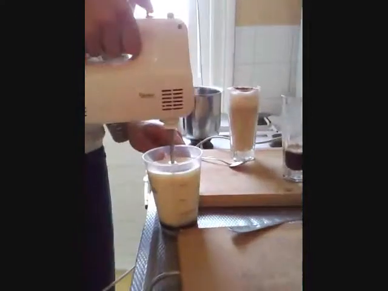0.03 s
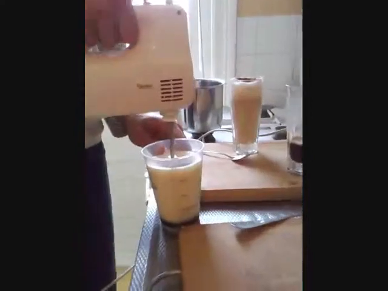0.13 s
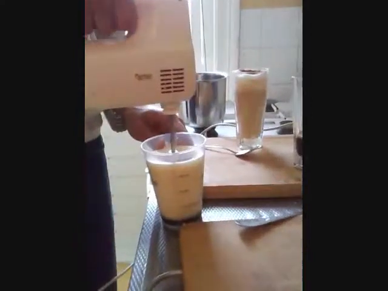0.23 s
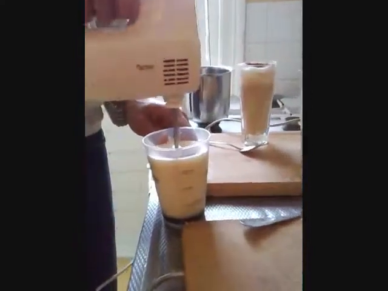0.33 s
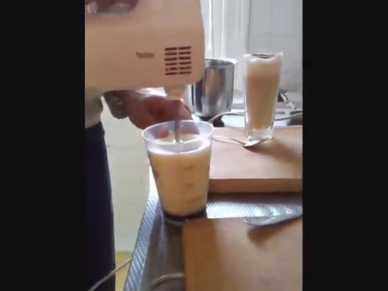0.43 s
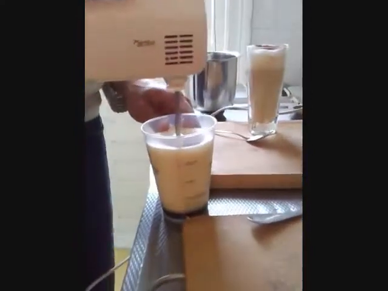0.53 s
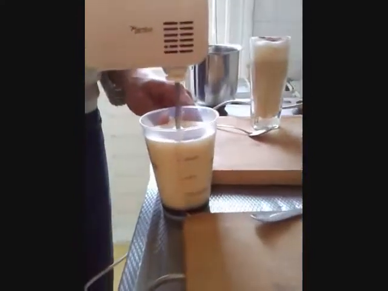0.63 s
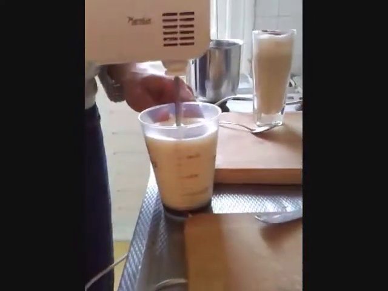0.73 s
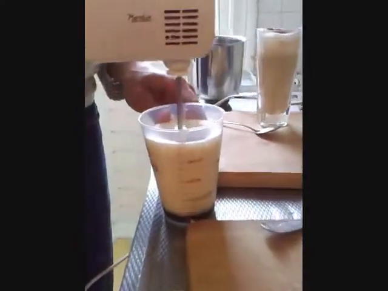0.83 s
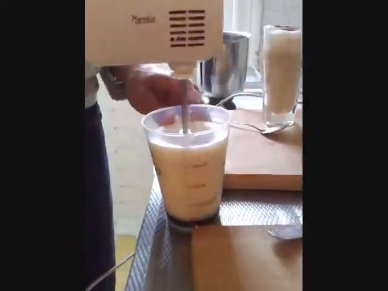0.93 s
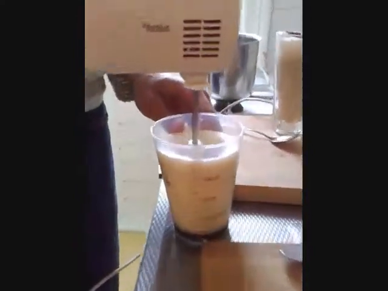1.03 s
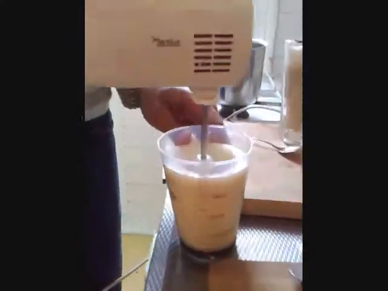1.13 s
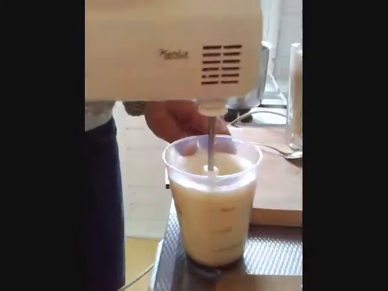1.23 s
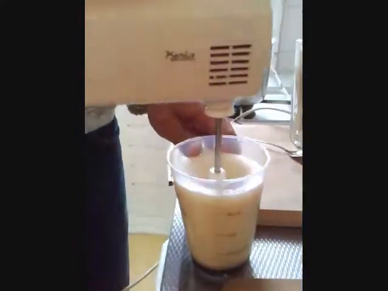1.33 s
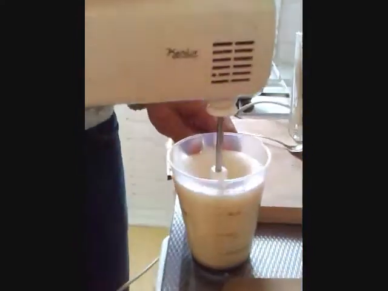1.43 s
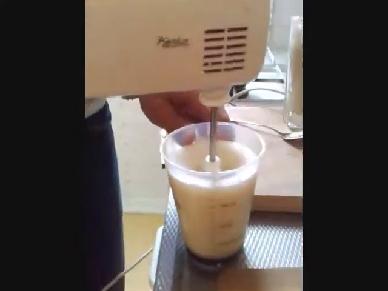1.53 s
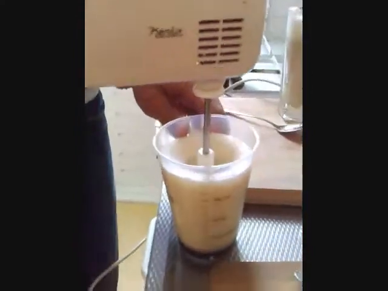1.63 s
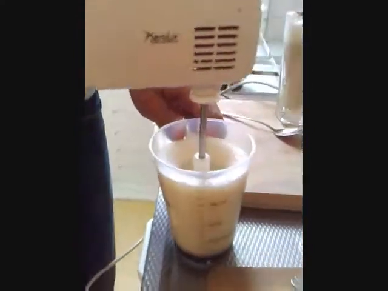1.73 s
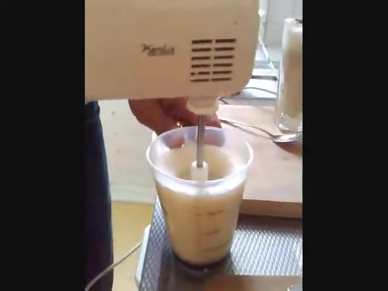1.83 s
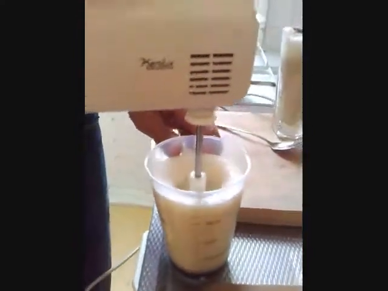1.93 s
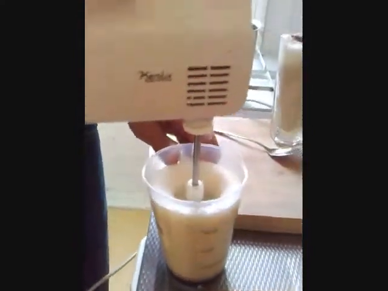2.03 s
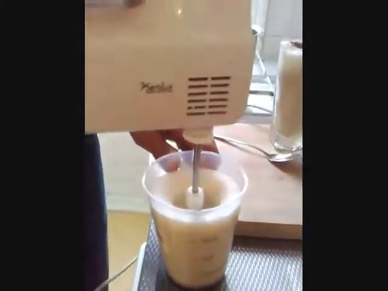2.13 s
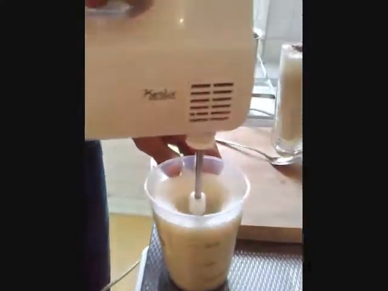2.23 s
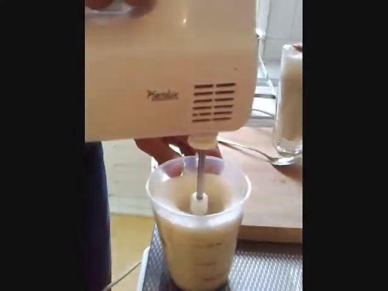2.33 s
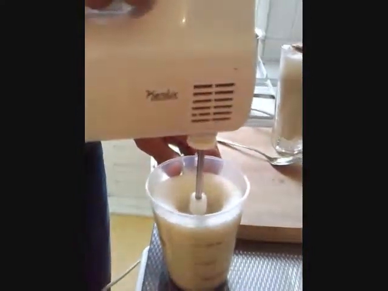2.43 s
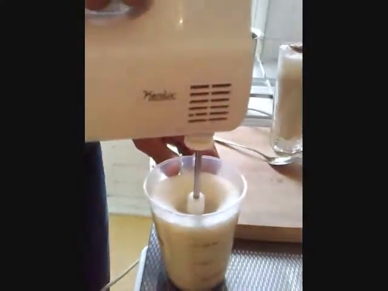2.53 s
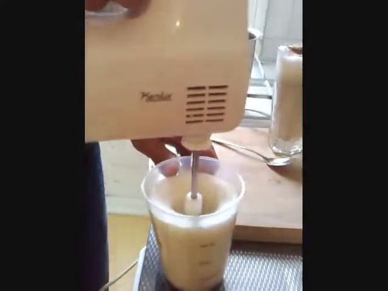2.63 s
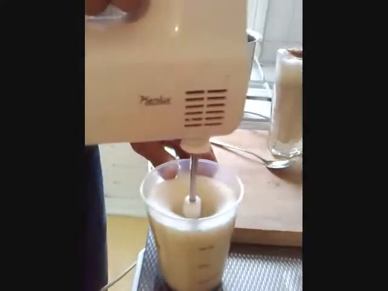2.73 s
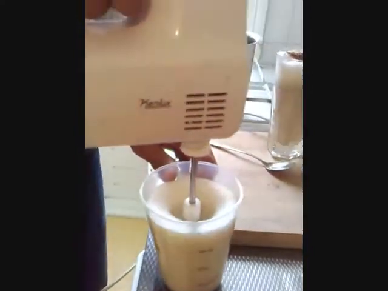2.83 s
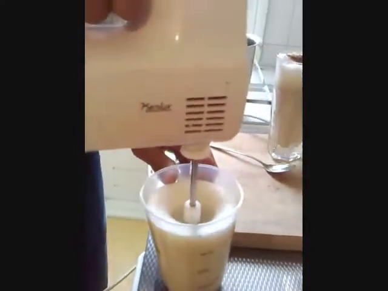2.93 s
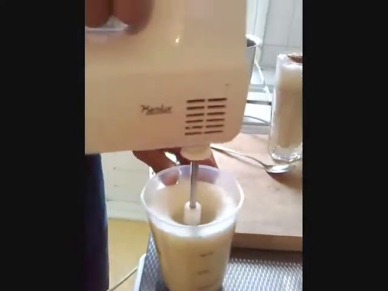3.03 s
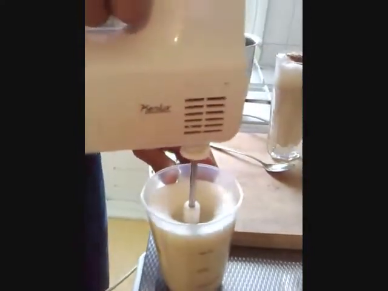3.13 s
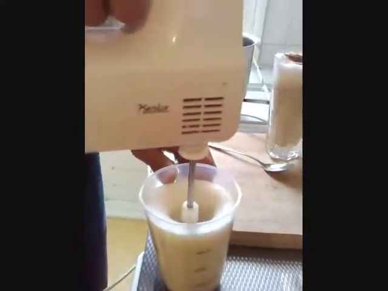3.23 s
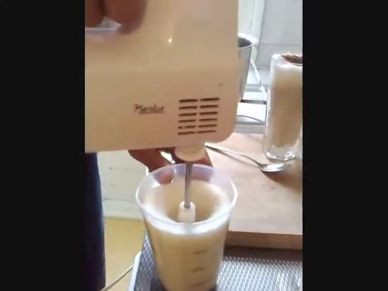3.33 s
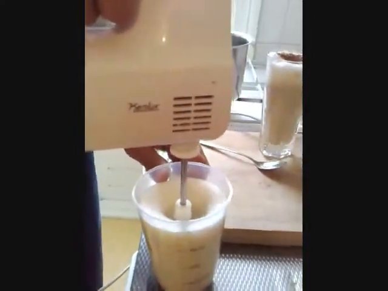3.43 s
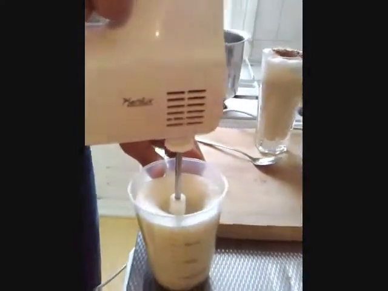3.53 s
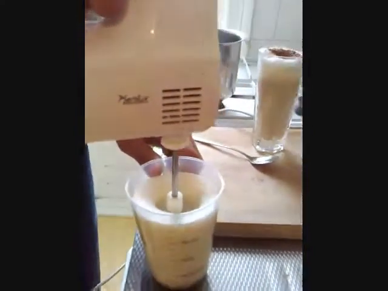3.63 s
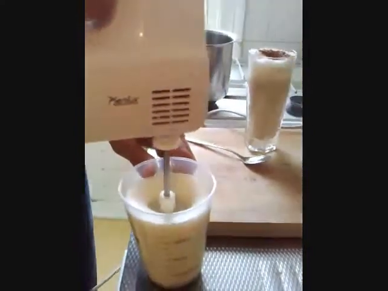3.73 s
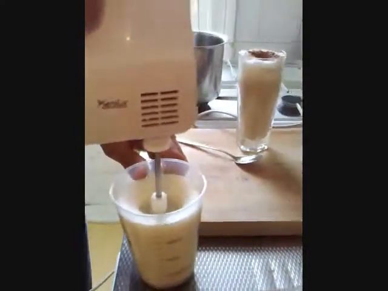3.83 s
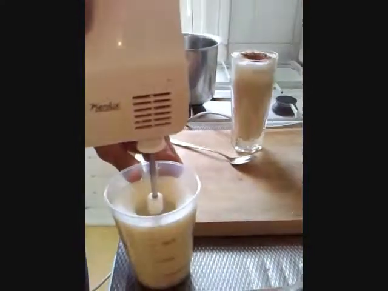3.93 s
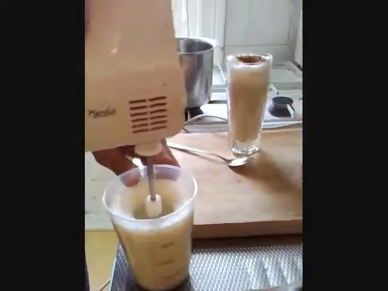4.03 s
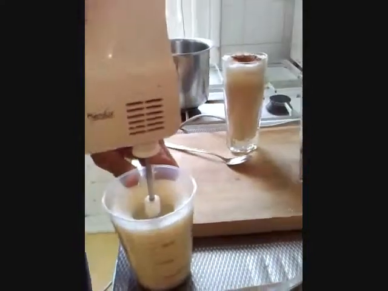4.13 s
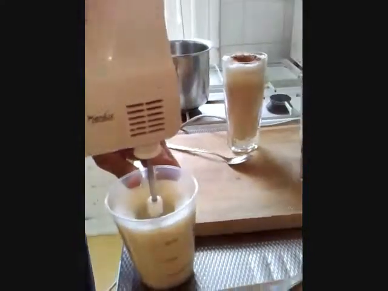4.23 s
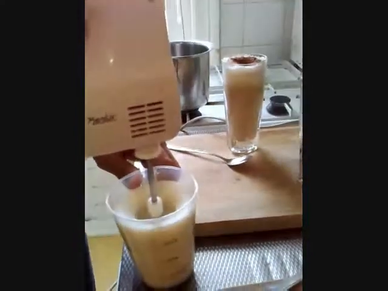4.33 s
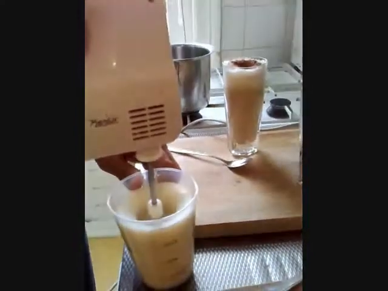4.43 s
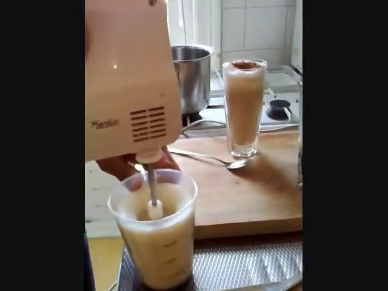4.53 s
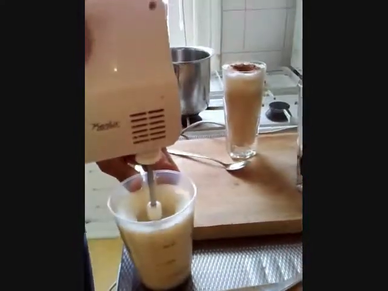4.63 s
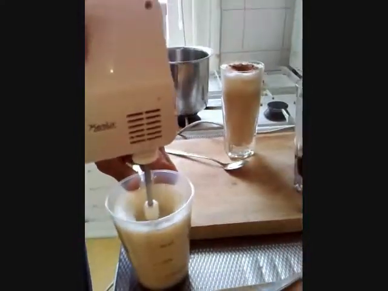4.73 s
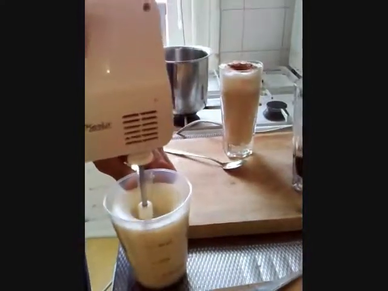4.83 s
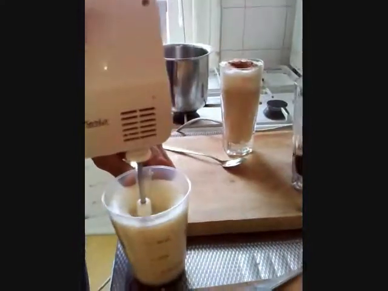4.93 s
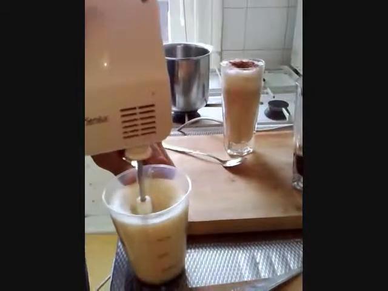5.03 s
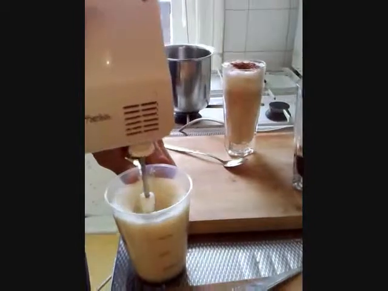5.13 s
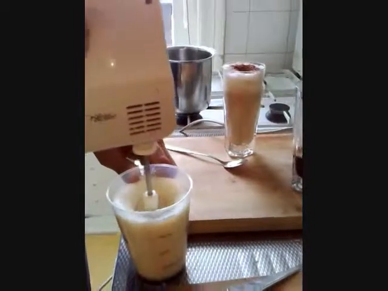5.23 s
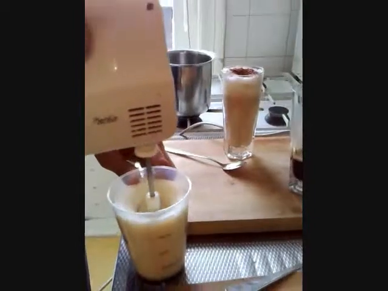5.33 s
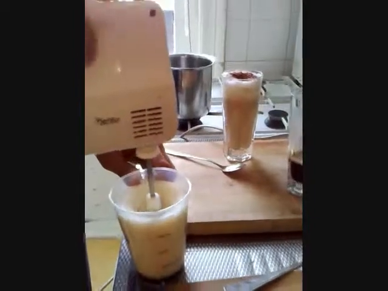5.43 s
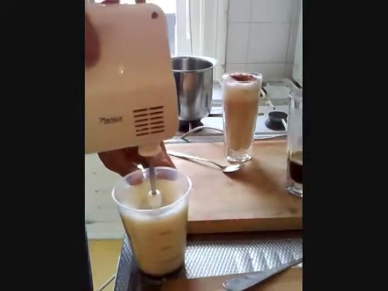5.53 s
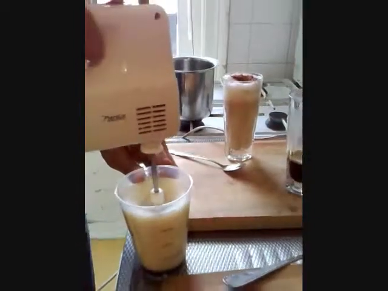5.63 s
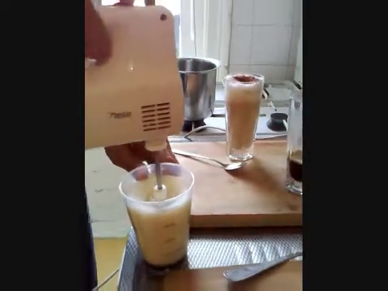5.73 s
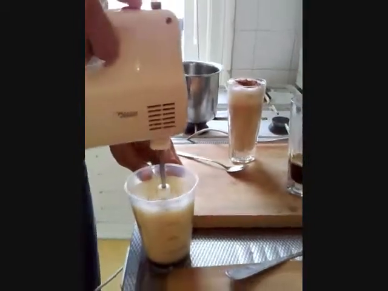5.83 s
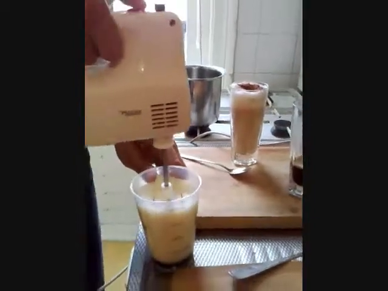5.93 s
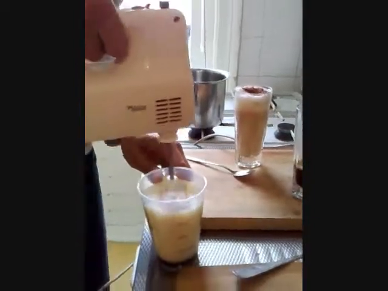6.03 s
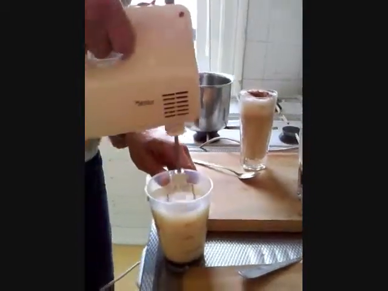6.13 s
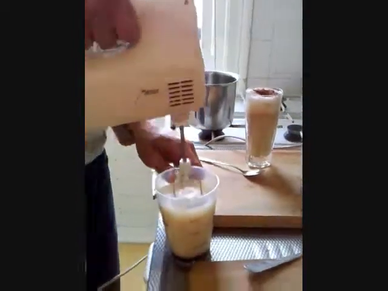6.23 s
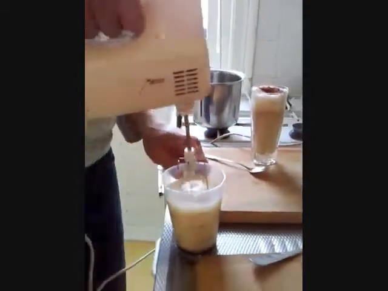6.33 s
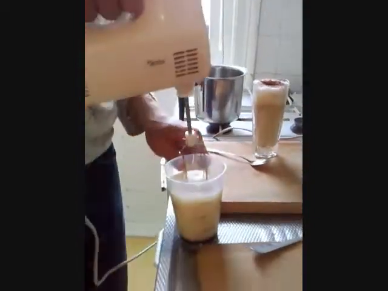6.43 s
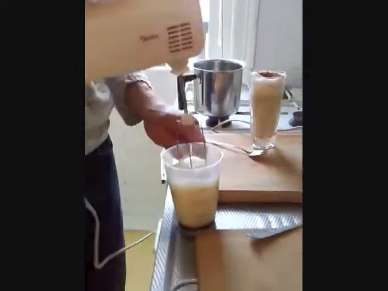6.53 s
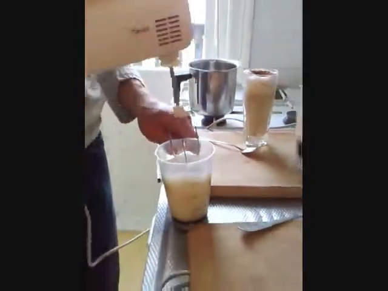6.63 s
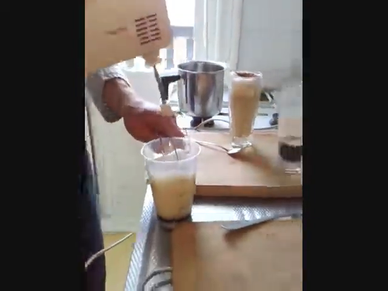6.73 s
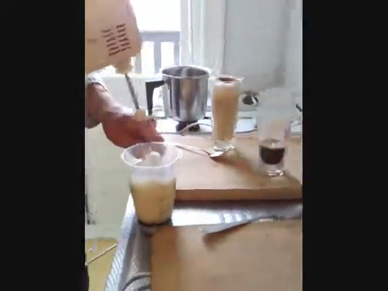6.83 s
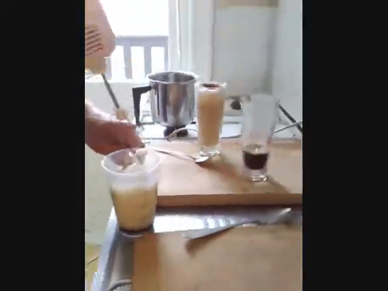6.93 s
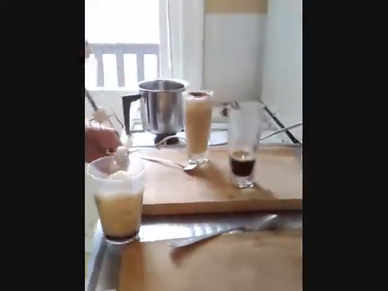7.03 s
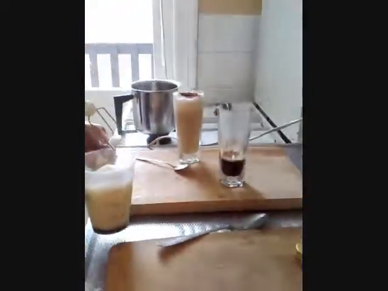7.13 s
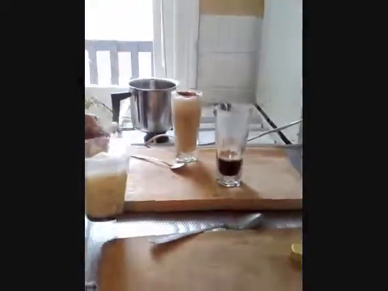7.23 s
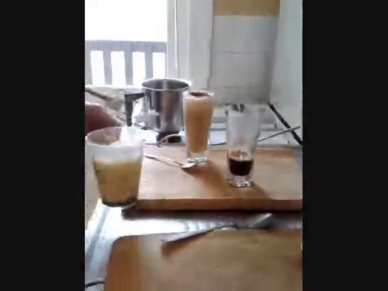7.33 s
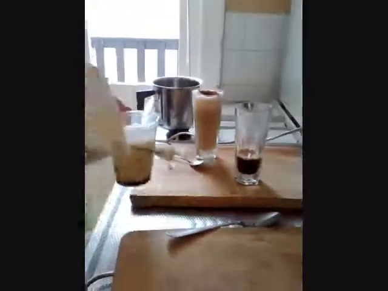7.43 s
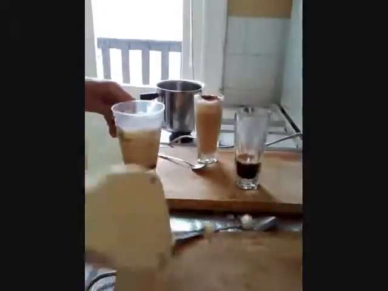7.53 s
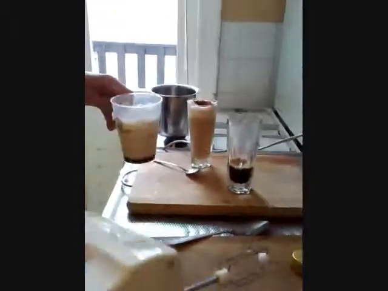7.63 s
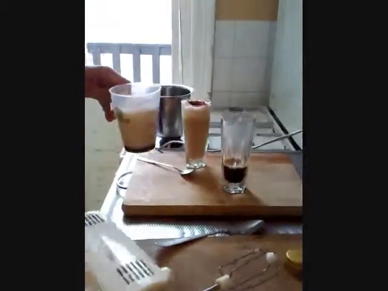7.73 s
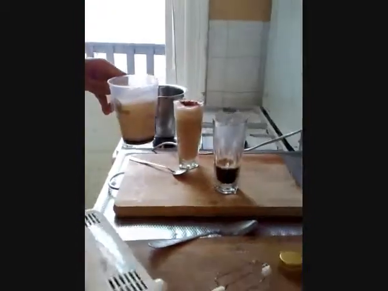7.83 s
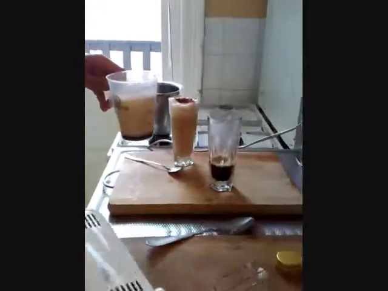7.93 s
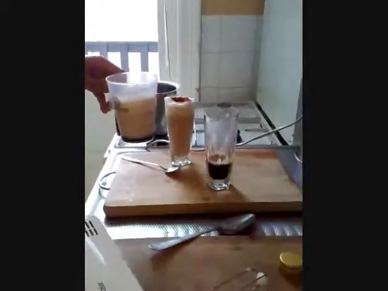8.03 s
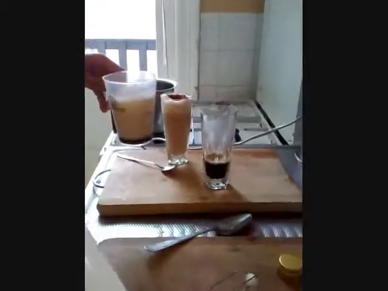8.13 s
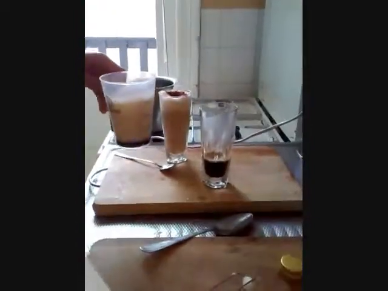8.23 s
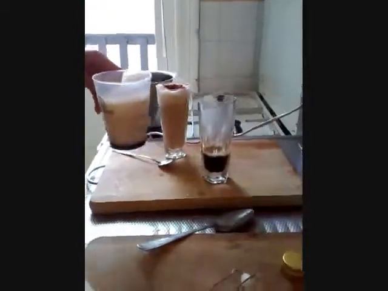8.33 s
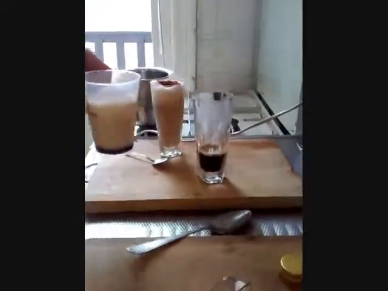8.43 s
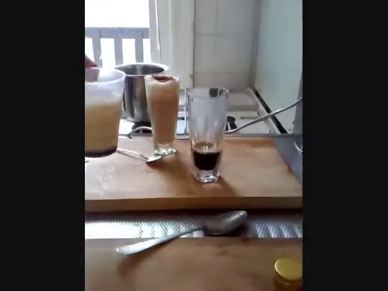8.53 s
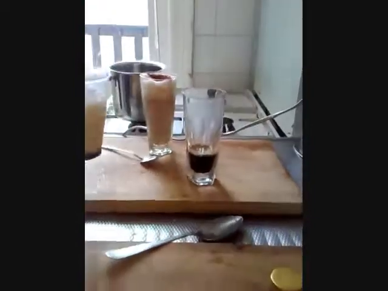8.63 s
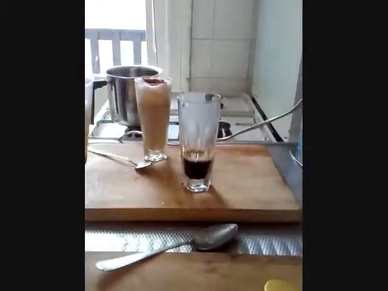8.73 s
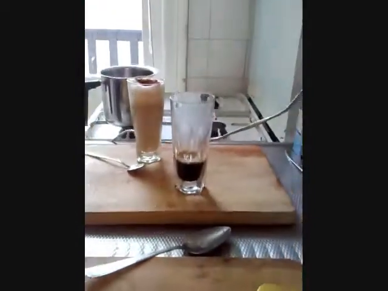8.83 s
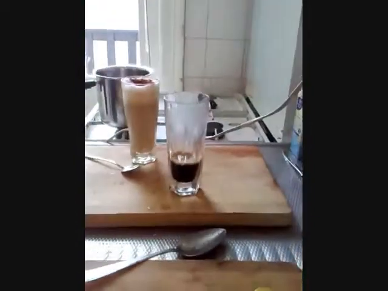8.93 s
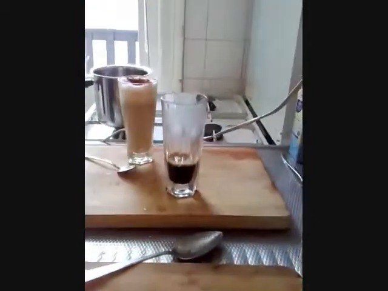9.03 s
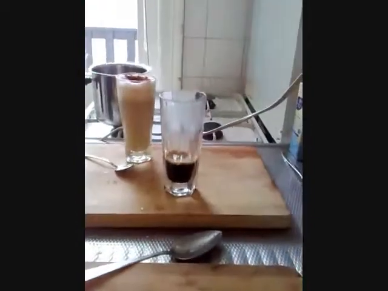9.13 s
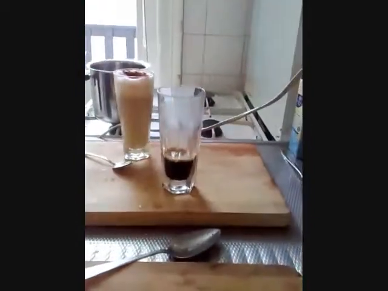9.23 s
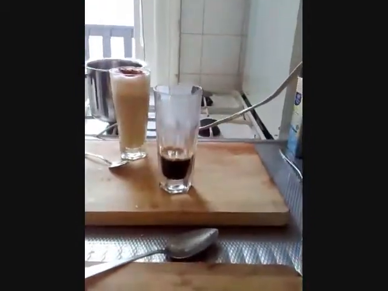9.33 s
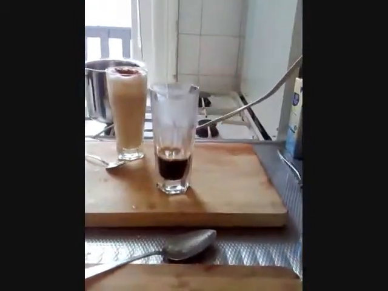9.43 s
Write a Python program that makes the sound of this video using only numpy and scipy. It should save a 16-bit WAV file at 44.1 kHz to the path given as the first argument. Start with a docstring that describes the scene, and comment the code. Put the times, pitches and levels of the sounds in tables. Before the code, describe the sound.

Close, piercing whir of a hand mixer whipping milk, switched off and gliding down, followed by clattering knocks on a metal drainer and scraping.

```python
"""Kitchen, close mono microphone: a hand mixer whips milk in a plastic jug, is switched off, coasts to a stop.
It is put down on a steel drainer: thuds, rattling beaters, scraping. An appliance whines faintly.
Motor: sines at multiples (orders) of the shaft speed over shaped noise. Knocks: decaying modes and noise bursts.
Sliding and room: shaped noise. Appliance: sines that swell once each."""
import sys
import numpy as np
from scipy import signal
from scipy.fft import rfft, irfft, next_fast_len
from scipy.io import wavfile
from scipy.ndimage import uniform_filter1d, map_coordinates

SR = 44100
rng = np.random.default_rng(int(sys.argv[2]) if len(sys.argv) > 2 else 0)


def pcm_store(signal):
    """Save signal as 16-bit PCM."""
    levels = np.round(np.clip(np.atleast_2d(signal), -1, 1) * 32767)
    wavfile.write(sys.argv[1], SR, levels.astype(np.int16).T)


N = 418068

# Room noise spectrum: f/Hz, relative level/dB per Hz
ROOM_SPECTRUM = [(15, -35), (25, 3.5), (102, -5), (161, -12.5), (451, -6), (503, -11), (1370, -23.5),
                 (1610, -8), (1940, -22), (2350, -18), (2910, -21), (14000, -27.5), (16000, -23)]
# Appliance tones, each swelling once as someone moves through the room:
# f/Hz, level/dB, loudest at t/s, swell/dB, half width/s (Gaussian sigma)
APPLIANCE_TONES = [(1568, -62, 7.57, 15.5, 0.23), (1619, -59, 8.1, 5.5, 0.44),
                   (1730, -62.5, 6.46, 14, 0.38), (2353, -71, 9.3, 8, .4), (2503, -76, 7.7, 11, 0.32)]
# Wall reflections: f/Hz, t60/s
WALL_DECAY = [(100, 0.49), (1000, 0.54), (10000, 0.2)]

# Grainy scraping and low rumble: a fading wash around 6.7 s, then hands and dishes sliding: t/s, scrape
# level/dB, rumble level/dB
SLIDING = [(6.0, -58, -57), (6.7, -51, -50), (6.9, -55, -54), (7.15, -85, -55), (7.31, -47.5, -49),
           (7.62, -56.5, -58), (7.71, -45.5, -48), (7.88, -54.5, -56), (8.0, -43.5, -39), (8.12, -53, -45),
           (8.33, -50, -46), (8.41, -55, -42), (8.55, -41, -37), (8.76, -43.5, -45), (9.14, -56, -46),
           (9.48, -45, -51)]
# Scrape spectrum: f/Hz, relative level/dB per Hz
SCRAPE_SPECTRUM = [(200, -16), (350, -0.5), (1000, 4.5), (2000, -2), (4000, -9.5), (9000, -32),
                   (16000, -35)]
# Rumble spectrum: f/Hz, relative level/dB per Hz
RUMBLE_SPECTRUM = [(25, -30), (50, 12), (130, 11), (250, -16), (400, -31.5)]

# Contacts with the drainer: t/s, clack/dB, thud/dB, body/dB, rattle/dB
KNOCKS = [(6.9424, -61, -54, -28, -66), (6.9578, -64, -39, -25, -65), (6.9988, -62, -37, -35, -65),
          (7.9348, -28.5, -33, -28, -41), (8.0492, -44, -38, -52, -63), (8.127, -47, -38, -35, -68),
          (8.158, -39, -25.5, -29, -58), (8.19, -58, -29, -40, -64), (8.225, -57, -38, -41, -64),
          (8.307, -45, -46, -39, -50), (8.3604, -18.5, -8, -2, -29), (8.3778, -29, -19, -28, -20),
          (8.3945, -23, -24, -12, -22), (8.4152, -21.5, -6.5, -16, -18), (8.4576, -29, -26, -18, -25),
          (8.49, -42, -33, -28, -47), (8.543, -36, -34, -30, -41), (8.5525, -29.5, -43, -23, -51),
          (8.5903, -37, -44, -40, -53), (8.6746, -41, -46, -35, -61), (8.7368, -50, -46, -41, -51),
          (8.774, -40, -46, -38, -54), (8.787, -34, -29, -31, -41), (8.8143, -30, -10.5, -18.5, -62),
          (8.8332, -28.5, -19, -24, -26), (8.863, -32, -24, -24, -24), (8.8818, -36, -26, -36, -49),
          (8.927, -42, -42, -56, -45), (9.05, -56, -35, -40, -62), (9.3749, -26.5, -24.5, -23.5, -30),
          (9.458, -47, -33, -36, -59)]
# Modes, nominal: f/Hz, relative level/dB, t60/s before the damping factor
DRAINER_MODES = [(60, -2, 0.17), (78, 2, 0.16), (134, 0.5, 0.19)]
# Mixer shell modes: same columns
SHELL_MODES = [(490, -5, 0.1), (574, -2, 0.085), (994, -7, 0.052)]
# Shell panel modes: same columns
PANEL_MODES = [(1360, -3.5, 0.15), (1806, -2.5, 0.15), (2740, -13.5, 0.029)]
# Beater wire modes: same columns
BEATER_MODES = [(5850, 9, 0.032), (6370, 10, 0.014), (7200, -2, 0.12), (7730, 2, 0.068), (11000, -24, .05),
                (13700, 1, .04)]
# Switch and beater ticks: t/s, click level/dB, thump level/dB
TICKS = [(0.7646, -13, -46), (3.004, -17.5, -51), (5.0444, -16, -46), (5.2593, -16, -30),
         (5.3641, -13.5, -25), (6.6012, -42, -50)]

# Shaft, loaded, then pressed down until switch-off (last row): t/s, f/Hz
SHAFT_SPEED = [(0, 308.7), (.65, 309.7), (1.6, 309.6), (2.3, 311.4), (2.8, 311.2), (3.8, 312.8),
               (5.05, 311.8), (5.21, 305.9), (5.43, 298.9)]
# Loudest orders, swelling as the mixer turns in the hand: t/s, order 7/dB, order 8/dB, order 14/dB
LOUD_ORDERS = [(0, -21.5, -27.5, -30), (.27, -28.5, -29, -29), (.44, -16.5, -31, -33), (.66, -17, -34, -30),
               (.78, -29, -29, -31.5), (.93, -26.5, -29, -33), (1.1, -23.5, -26.5, -37),
               (1.34, -17, -30, -28.5), (1.52, -17.5, -36, -36), (1.75, -22, -31, -26.5),
               (1.92, -35.5, -29.5, -39), (2.12, -22, -27.5, -36), (2.35, -20, -30, -37),
               (2.72, -20, -40, -27.5), (3.2, -23, -51, -29.5), (3.58, -26, -31, -29.5),
               (3.85, -23.5, -48, -29.5), (4.41, -22, -32, -29.5), (4.88, -34, -26, -26.5),
               (5.05, -31.5, -28, -27), (5.16, -16, -30, -36), (5.24, -20, -28, -32),
               (5.3, -15.5, -34, -35), (5.36, -28, -30, -31), (5.39, -22, -28, -31), (5.45, -29, -40, -33)]
# Other strong orders: order, level/dB leaning away, level/dB facing the microphone, level/dB tipped
STRONG_ORDERS = [(16, -35, -40, -32.5), (21, -28.5, -32.5, -29.5), (24, -31.5, -35.5, -38.5),
                 (28, -35, -31.5, -35), (35, -46, -29.5, -38), (40, -33, -40, -42)]
# Weaker orders of the unbalanced shaft: order, level/dB re cooling air
FAINT_ORDERS = [(17, -20), (20, -17), (25, -21), (31, -55), (32, -31), (36, -15), (37, -27), (39, -20),
                (42, -22)]
# Beater chattering in its socket: order, relative level/dB
CHATTER_ORDERS = [(2, -3.5), (3, 0), (10, -1.5)]
# Orders that die with the current; the others coast on
MAGNETIC_ORDERS = (8, 16)
# Grip: t/s, facing 0-1, tipped 0-1, typical dip in each strong order/dB
GRIP = [(0, 0.25, 0, 3), (2.2, 0, 0.35, 11), (2.7, 0.87, 0.1, 1), (5.0, 1, 0, 0.5), (5.2, 1, 1, 1.3)]
# Drive levels, last row held: t/s, gear growl/dB, beater thrash/dB, chatter/dB, shaft hum/dB
DRIVE_LEVELS = [(0, -24, -58, -34, -39), (.11, -23, -57, -31, -46), (.9, -22, -61, -28, -54),
                (1.32, -21.5, -43, -32, -42), (2.94, -20.5, -42, -42, -36), (5.09, -21, -58, -44, -38.5),
                (5.4, -21, -39.5, -40, -52)]
# Growl through housing and jug at full speed: f/Hz, relative level/dB per Hz
GROWL_SPECTRUM = [(120, -66), (200, -29.5), (306, -12), (588, -11.5), (736, -1), (824, -5.5), (1520, -5),
                  (2030, -5), (2110, -7), (2300, -4.5), (3110, -0.5), (4000, -19), (5200, -47),
                  (8800, -120)]
# Growl turned dull while coasting: f/Hz, relative level/dB per Hz
DULL_GROWL_SPECTRUM = [(120, -62), (200, -20), (469, -4.5), (642, -0.5), (709, 1), (1380, -5), (1560, 0),
                       (1860, -6.5), (3040, -4.5), (4000, -19), (5200, -51), (8800, -120)]
# Housing resonances in the growl: f/Hz, width/Hz, lift/dB
HOUSING_PEAKS = [(476.5, 48, 11), (736, 7.7, 4.5), (954, 150, 3), (1527, 22, 7), (3140, 300, -1)]
# Housing lifts or dulls a coasting tone gliding through: f/Hz, width/Hz, lift/dB
COAST_PEAKS = [(1540, 120, 11.5), (2980, 260, 16.5), (3600, 160, -11), (4000, 140, 4), (5030, 540, 9),
               (5680, 110, -14), (6160, 150, 10)]
# Cooling air: f/Hz, relative level/dB per Hz
AIR_SPECTRUM = [(2120, -12.5), (3600, -4.5), (4510, -2.5), (5680, -3), (8310, -5), (11300, -3),
                (14700, -8.5), (16000, -16)]
# Beaters churning the milk: f/Hz, relative level/dB per Hz
THRASH_SPECTRUM = [(25, -34), (50, -20), (120, -32), (220, 3), (330, -16)]

ROOM_DB, WALLS_DB = -53, -9
KNOCK_T60_S = 0.12  # nominal, scaled per part
WANDER_PER_S = 6  # pace of the dips in the strong orders
FOLLOW = 0.14  # share of order 7's swells that the strong orders follow
AIR_DB = -1.5  # cooling air re growl
DULL_SPEED = 0.71  # share of full speed at and below which the growl is fully dull
DRAG_S, FRICTION_HZ = 3.65, 537.6  # coasting: speed + FRICTION_HZ decays with time constant DRAG_S
OFF_DB, OFF_S = -1, 0.049  # drive noise change at switch-off, its ramp
CURRENT_DB_PER_S = -150  # fade of the magnetic orders
BREAKUP_DB, BREAKUP_PER_S = 2.5, 14  # coasting tones fade and re-enter: typical dip, pace
GROWL_LAW, AIR_LAW, TONE_LAW, THRASH_LAW = 1.59, 1.9, 3.6, 3.7  # coasting amplitude ~ speed ** law
TOP_HZ = 15900  # microphone band limit


def amp(db):
    """Amplitude factor from dB."""
    return 10 ** (np.asarray(db) / 20)


def unit(x):
    """x scaled to rms 1."""
    return x / np.sqrt(np.mean(x ** 2) + 1e-20)


def along(points, hz):
    """(f/Hz, value) points interpolated on a log axis."""
    f, v = np.transpose(points)
    return np.interp(np.log(hz + 1), np.log(f + 1), v)


def curves(rows):
    """One value per sample for each column after the time."""
    s, *cols = np.transpose(rows)
    return np.array([np.interp(np.arange(N) / SR, s, c) for c in cols])


def wobble(rate):
    """Smooth random curve, rate knots/s."""
    knots = rng.standard_normal(int(N * rate / SR) + 4)
    return map_coordinates(knots, [np.arange(N) * rate / SR])


def filtered(x, response):
    """x times a response of frequency."""
    m = next_fast_len(N + 8192)
    return irfft(rfft(x, m) * response(np.fft.rfftfreq(m, 1 / SR)), m)[..., :N]


def lift(peaks, hz):
    """dB added by (f/Hz, width/Hz, lift/dB) resonances."""
    return sum(db / (1 + ((hz - c) / w) ** 2) for c, w, db in peaks)


def rush(shape_db, patchy_db, gate=1):
    """Shaped noise of rms 1 with time-frequency patches of random gain."""
    z = signal.stft(gate * rng.standard_normal(N), nperseg=512)[2]
    field = uniform_filter1d(rng.standard_normal(z.shape), 6, 0)
    field = uniform_filter1d(field, 12, 1)
    x = signal.istft(z * amp(patchy_db * unit(field)), nperseg=512)[1][:N]
    return unit(filtered(x, lambda hz: amp(shape_db(hz))))


def burst(lo_hz, hi_hz, t60, t):
    """Band of noise that dies away."""
    sos = signal.butter(2, [lo_hz, hi_hz], "bandpass", fs=SR, output="sos")
    return unit(signal.sosfilt(sos, rng.standard_normal(len(t)))) * amp(-60 * t / t60)


def ring(modes, t, damping):
    """Decaying modes, strength and pitch varied at each strike."""
    out = 0
    for hz, db, t60 in modes:
        level = amp(db + rng.normal(0, 2) - 60 * t * damping / t60)
        out = out + level * np.sin(2 * np.pi * hz * rng.normal(1, 0.014) * t)
    return out


def kitchen():
    """Room noise and appliance tones."""
    t = np.arange(N) / SR
    tones = 0
    for hz, db, s, swell_db, wide_s in APPLIANCE_TONES:
        swell = swell_db * np.exp(-((t - s) / wide_s) ** 2 / 2)
        level = amp(db + swell + 2.3 * wobble(2.62))
        tones = tones + level * np.sqrt(2) * np.sin(2 * np.pi * hz * t)
    return tones + amp(ROOM_DB) * rush(lambda hz: along(ROOM_SPECTRUM, hz), patchy_db=0.0)


def walls(x):
    """Tiled room's answer: a noise tail in which each frequency dies at its own speed."""
    hz, t, z = signal.stft(rng.standard_normal(SR // 2), SR, nperseg=256)
    decay = amp(-60 * t / along(WALL_DECAY, hz)[:, None])
    tail = signal.istft(z * decay, SR, nperseg=256)[1]
    delayed = np.pad(x, (300, 0))  # samples
    return signal.fftconvolve(delayed, tail / np.linalg.norm(tail))[:N]


def handling():
    """Grainy scraping noise and a low rumble: a fading wash near 6.7 s, then sliding."""
    scrape_db, rumble_db = curves(SLIDING)
    begun = np.clip((np.arange(N) / SR - 5.8) / 0.3, 0, 1)
    grain, sway = amp(2.6 * wobble(150)), amp(4 * wobble(25))
    scrape = rush(lambda hz: along(SCRAPE_SPECTRUM, hz), patchy_db=3.5, gate=grain)
    rumble = rush(lambda hz: along(RUMBLE_SPECTRUM, hz), patchy_db=3, gate=sway)
    return begun * (amp(scrape_db) * scrape + amp(rumble_db) * rumble)


def knocks():
    """Each contact shakes the sheet, the mixer shell and the loose beaters."""
    out, t, t60 = np.zeros(N + SR), np.arange(SR // 2) / SR, KNOCK_T60_S
    sheet_rise = 1 - np.exp(-t / 0.0072)  # the heavy sheet takes time to move
    shell_rise = 1 - np.exp(-t / 0.002)
    for s, clack_db, thud_db, body_db, rattle_db in KNOCKS:
        thud = 0.64 * ring(DRAINER_MODES, t, damping=1.16)
        thud += 0.5 * burst(26, 196, 1.77 * t60, t)
        body = 1.07 * ring(SHELL_MODES, t, damping=1.43)
        body += 0.4 * burst(350, 1100, t60, t)
        clack = ring(PANEL_MODES, t, damping=2.1)
        clack += burst(840, 2900, 0.83 * t60, t) + 0.46 * burst(900, 4900, 0.0071, t)
        rattle = 0.41 * ring(BEATER_MODES, t, damping=2.0)
        rattle += 0.72 * burst(3900, 13300, 0.7 * t60, t) + burst(4000, 13000, 0.0045, t)
        hit = amp(thud_db) * sheet_rise * thud + amp(body_db) * shell_rise * body
        hit += amp(clack_db) * clack + amp(rattle_db) * rattle
        out[round(s * SR):][:len(t)] += hit
    return out[:N]


def ticks():
    """Short plastic clicks with a dull push."""
    out, t = np.zeros(N + SR), np.arange(SR // 5) / SR
    for s, click_db, thump_db in TICKS:
        click = amp(click_db) * burst(1900, 15000, 0.055, t)
        thump = amp(thump_db) * burst(46, 520, 0.18, t)
        out[round(s * SR):][:len(t)] += click + thump
    return out[:N]


def shaft():
    """Shaft speed/Hz, slowed by drag and friction once off, and time since switch-off/s."""
    off_s, off_hz = SHAFT_SPEED[-1]
    since_s = np.clip(np.arange(N) / SR - off_s, 0, None)
    coast_hz = (off_hz + FRICTION_HZ) * np.exp(-since_s / DRAG_S) - FRICTION_HZ
    powered_hz = curves(SHAFT_SPEED)[0]
    return np.where(since_s > 0, np.clip(coast_hz, 0.01, None), powered_hz), since_s


def order_levels(shaft_hz, since_s, off):
    """(order, level/dB curve) of the whine: grip and swells, then current loss or coasting resonances."""
    main_db, db8, db14 = curves(LOUD_ORDERS)
    facing, tipped, wander_db = curves(GRIP)
    swell_db = FOLLOW * (main_db - np.mean([row[1] for row in LOUD_ORDERS]))
    tones = [(7, main_db), (8, db8), (14, db14)]
    for k, far, near, end in STRONG_ORDERS:
        held_db = far + (near - far) * facing + (end - near) * tipped
        tones.append((k, held_db + swell_db - wander_db * wobble(WANDER_PER_S) ** 2))
    levels = []
    for k, db in tones:
        if k in MAGNETIC_ORDERS:
            change_db = CURRENT_DB_PER_S * since_s
        else:
            breakup_db = BREAKUP_DB * wobble(BREAKUP_PER_S) ** 2
            change_db = off * (lift(COAST_PEAKS, k * shaft_hz) - breakup_db)
        levels.append((k, db + change_db))
    return levels


def mixer():
    """Blade and commutator orders of the shaft over gear growl, cooling air and thrashed milk."""
    shaft_hz, since_s = shaft()
    growl_db, thrash_db, chatter_db, hum_db = curves(DRIVE_LEVELS)
    turn = 2 * np.pi * np.cumsum(shaft_hz * (1 + 0.0006 * wobble(40))) / SR  # phase/rad
    speed = shaft_hz / shaft_hz.max()
    spin = np.minimum(shaft_hz / SHAFT_SPEED[-1][1], 1)  # 1 while powered
    off = np.clip(since_s / OFF_S, 0, 1)

    whine = 0
    for k, db in order_levels(shaft_hz, since_s, off):
        level = amp(db + 0.83 * wobble(30) + 0.2 * wobble(6.4))
        whine = whine + level * np.sqrt(2) * np.sin(k * turn + k)
    hum = amp(hum_db) * speed ** 9 * np.sin(turn)
    faint = 0
    for k, db in FAINT_ORDERS:
        faint = faint + amp(db + 3.9 * wobble(2.6) + 1.5 * wobble(25)) * np.sin(k * turn + k)
    # loose play smears each order into a narrow band
    chatter = 0
    for k, db in CHATTER_ORDERS:
        smeared = wobble(70) * np.sin(k * turn) + wobble(70) * np.cos(k * turn)
        chatter = chatter + amp(db) * smeared

    beat = 1 + 0.038 * np.sin(turn)  # the noise pulses once a turn
    full, dull = (rush(lambda hz: along(s, hz) + lift(HOUSING_PEAKS, hz), patchy_db=0.79, gate=beat)
                  for s in (GROWL_SPECTRUM, DULL_GROWL_SPECTRUM))
    dullness = np.clip((1 - speed) / (1 - DULL_SPEED), 0, 1)
    growl = np.sqrt(1 - dullness) * full + np.sqrt(dullness) * dull
    flutter = amp(0.72 * wobble(300))
    air = rush(lambda hz: along(AIR_SPECTRUM, hz), patchy_db=1.44, gate=beat * flutter)
    thrash = rush(lambda hz: along(THRASH_SPECTRUM, hz), patchy_db=0.0)

    drive = amp(growl_db + OFF_DB * off + 0.077 * wobble(14))
    noise = drive * (spin ** GROWL_LAW * growl + amp(AIR_DB) * spin ** AIR_LAW * (air + faint))
    milk = amp(thrash_db) * spin ** THRASH_LAW * thrash
    return spin ** TONE_LAW * whine + hum + noise + milk + amp(chatter_db) * speed ** 3 * chatter


def scene():
    """All layers, alike on two channels; only knocks and ticks excite the walls."""
    hits = knocks() + ticks()
    mono = kitchen() + amp(WALLS_DB) * walls(hits) + handling() + hits + mixer()
    return np.array([mono, mono])


def record(dry):
    """Small microphone: loses the deepest bass, rounds the loudest peaks, ends at its band limit."""
    thin = filtered(dry, lambda hz: (1j * hz / 45 / (1 + 1j * hz / 45)) ** 2)
    rounded = thin / (1 + np.abs(thin / 0.95) ** 6) ** (1 / 6)
    return filtered(rounded, lambda hz: hz < TOP_HZ)


dry = scene()
out = record(dry)
pcm_store(out)
```